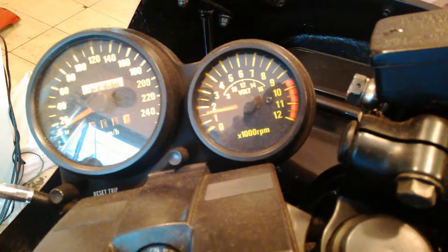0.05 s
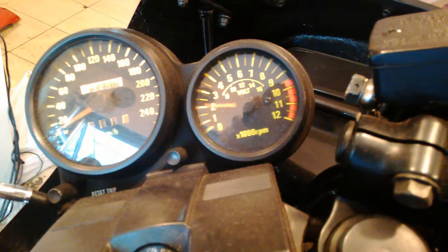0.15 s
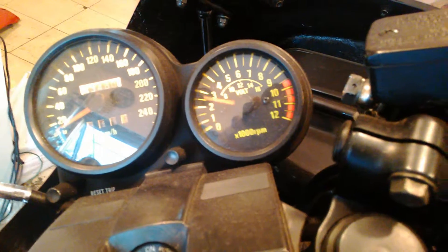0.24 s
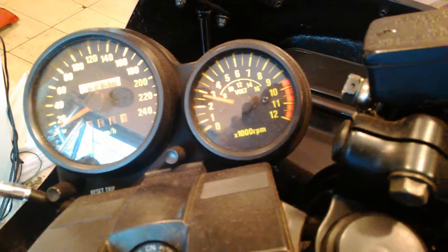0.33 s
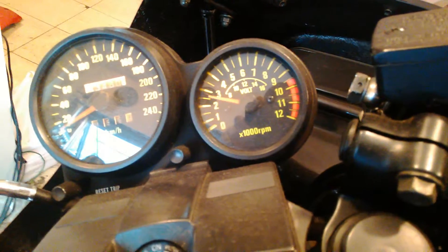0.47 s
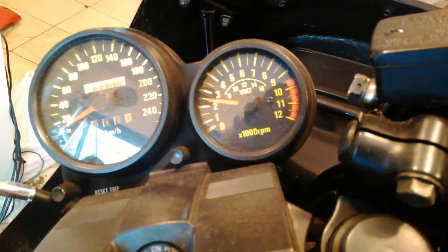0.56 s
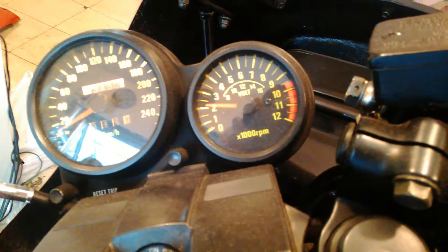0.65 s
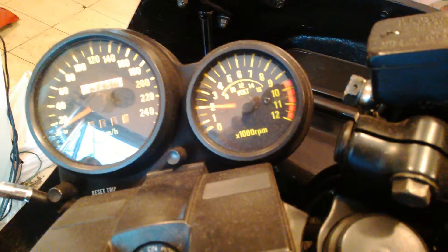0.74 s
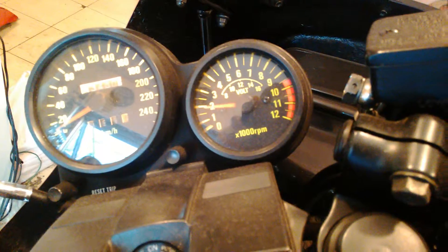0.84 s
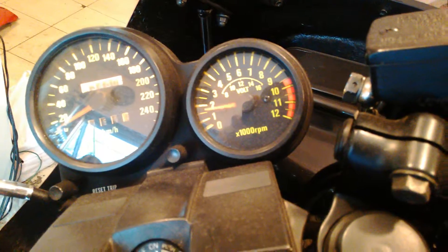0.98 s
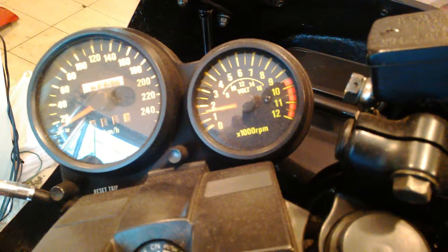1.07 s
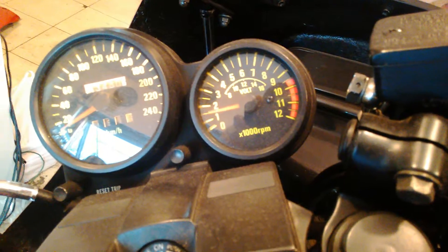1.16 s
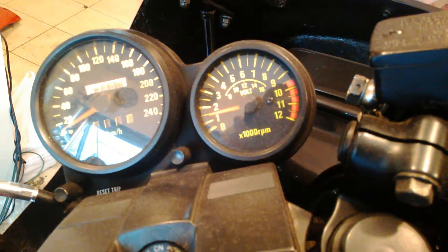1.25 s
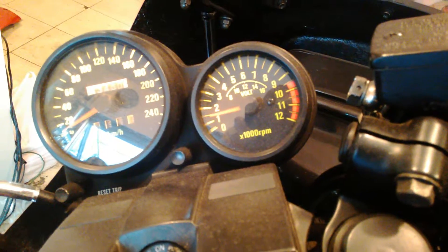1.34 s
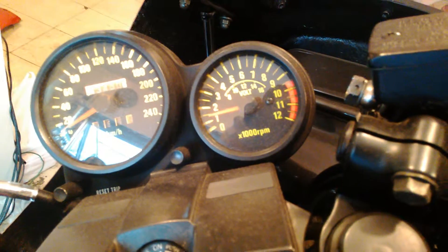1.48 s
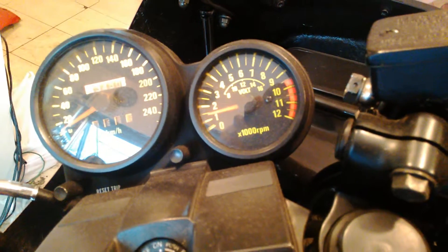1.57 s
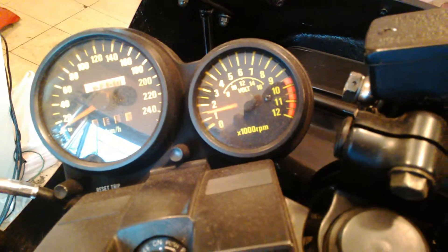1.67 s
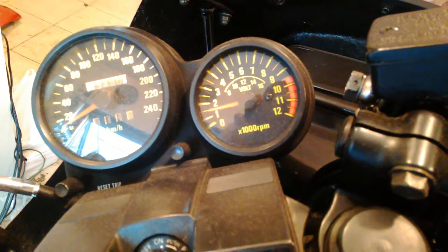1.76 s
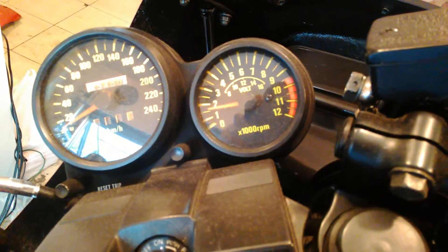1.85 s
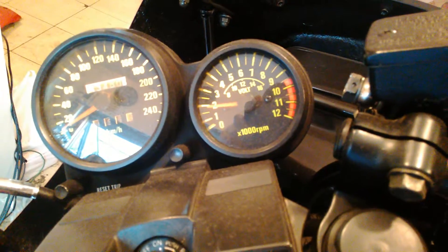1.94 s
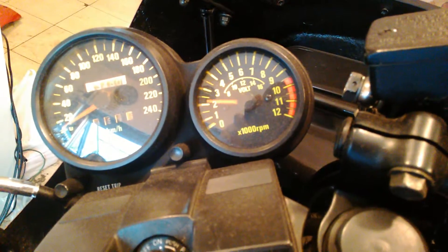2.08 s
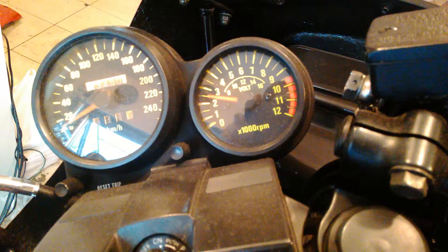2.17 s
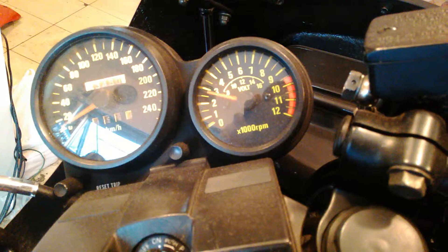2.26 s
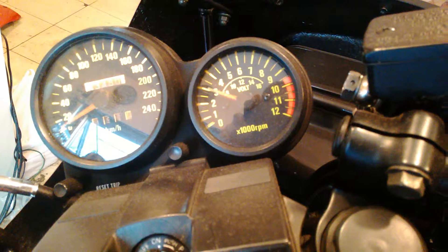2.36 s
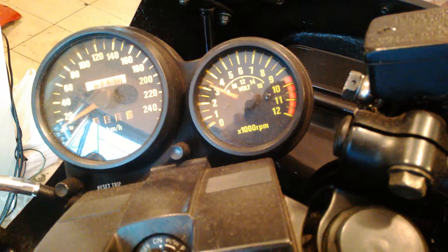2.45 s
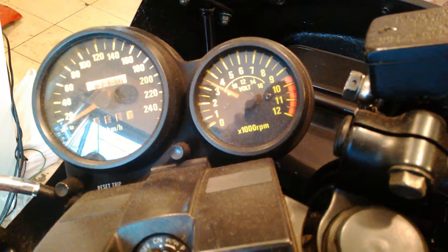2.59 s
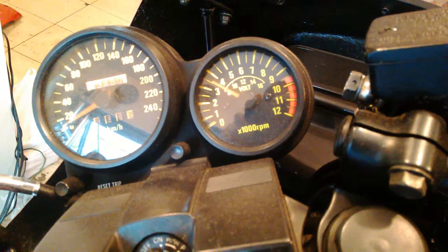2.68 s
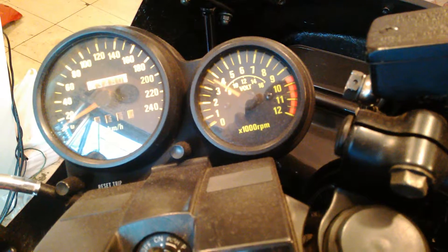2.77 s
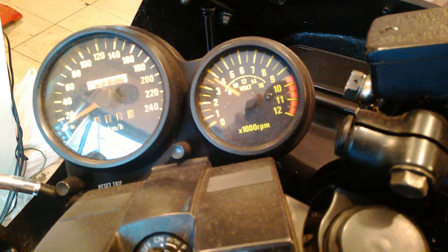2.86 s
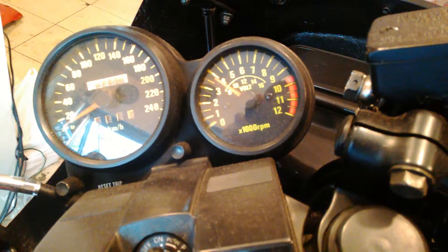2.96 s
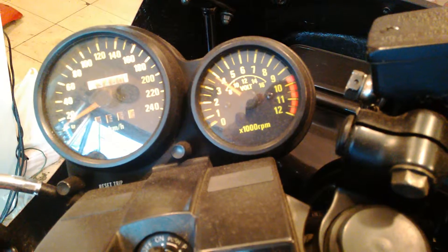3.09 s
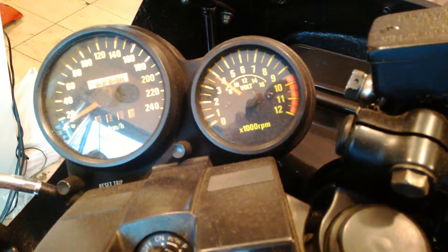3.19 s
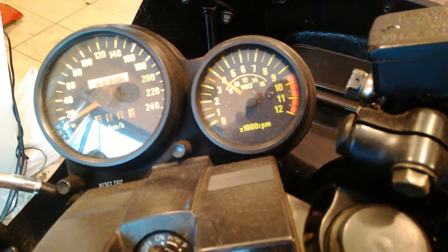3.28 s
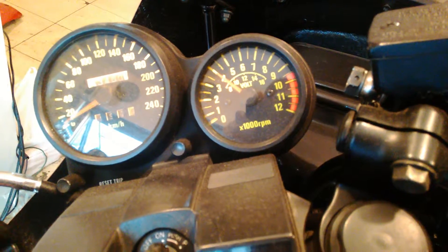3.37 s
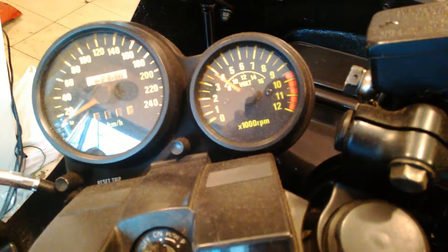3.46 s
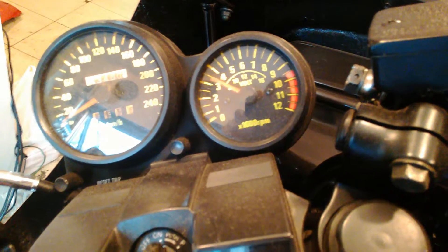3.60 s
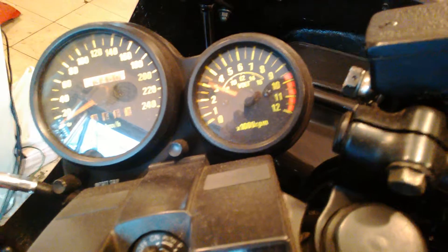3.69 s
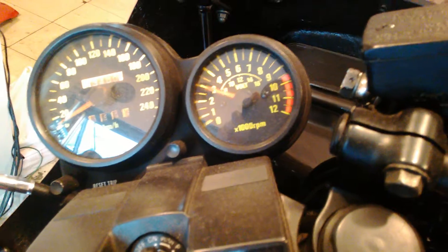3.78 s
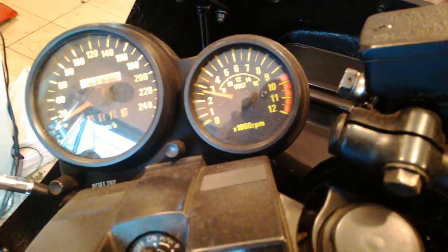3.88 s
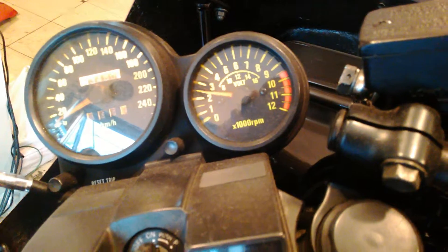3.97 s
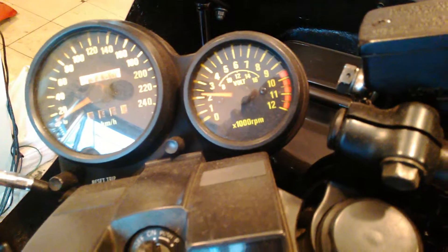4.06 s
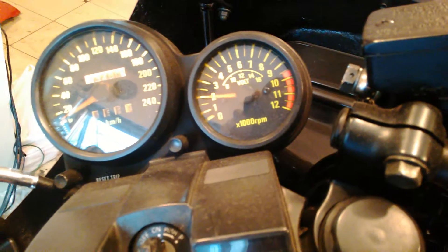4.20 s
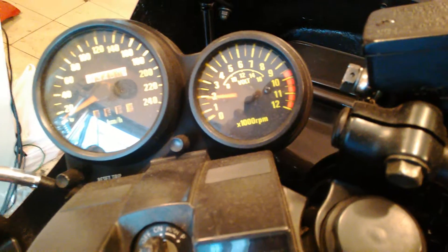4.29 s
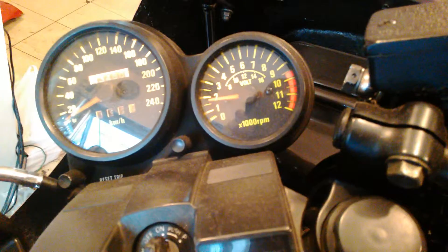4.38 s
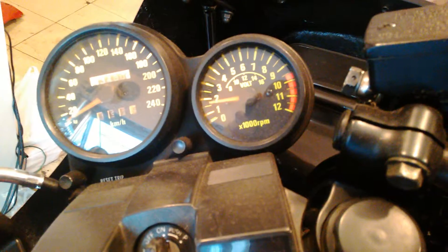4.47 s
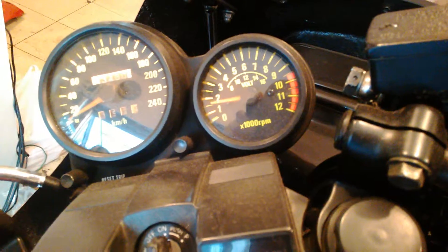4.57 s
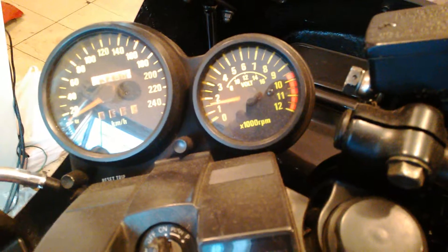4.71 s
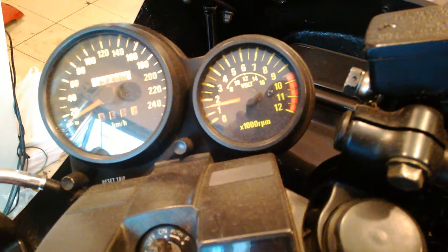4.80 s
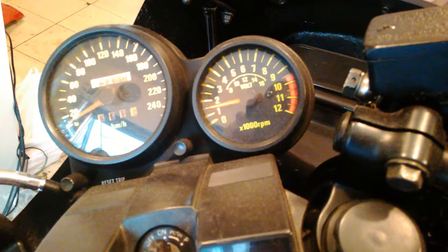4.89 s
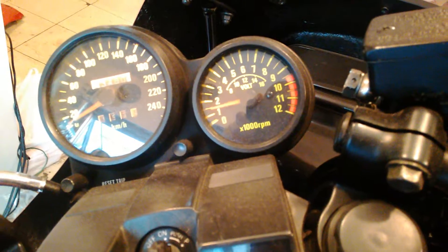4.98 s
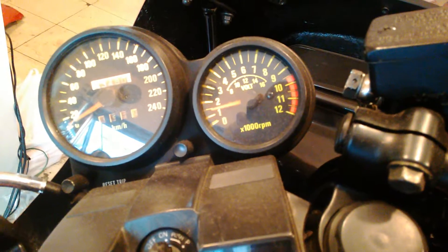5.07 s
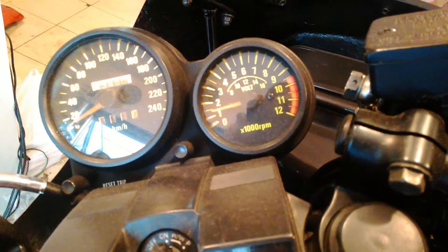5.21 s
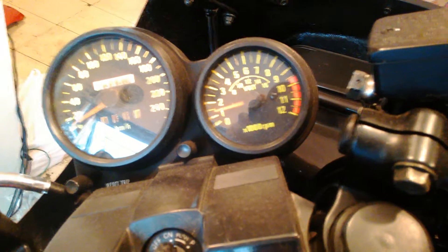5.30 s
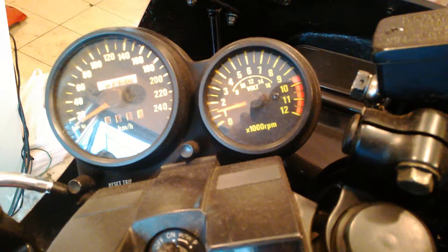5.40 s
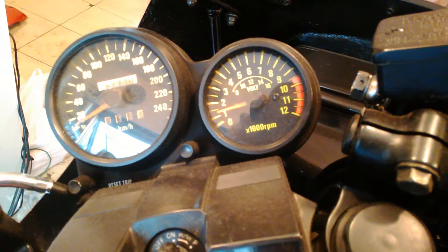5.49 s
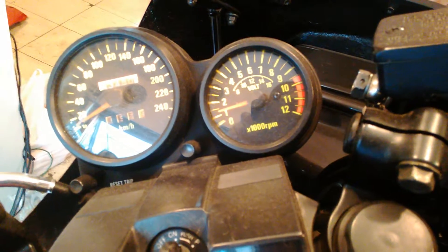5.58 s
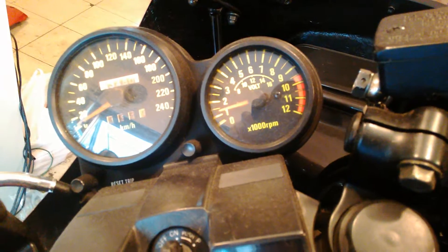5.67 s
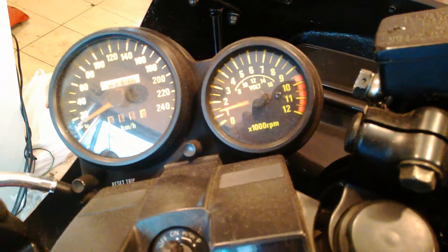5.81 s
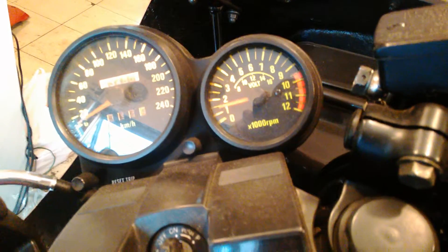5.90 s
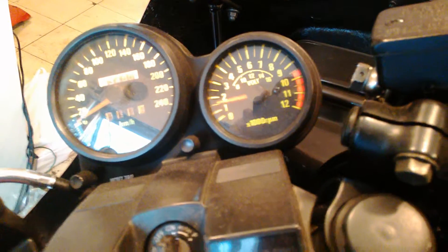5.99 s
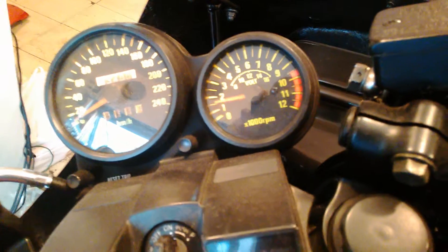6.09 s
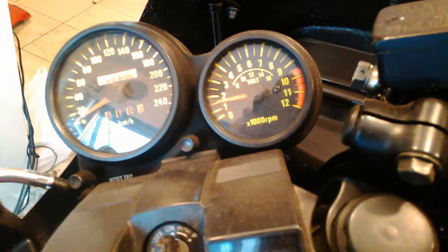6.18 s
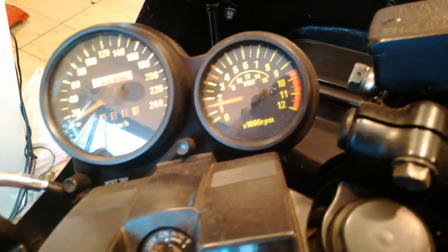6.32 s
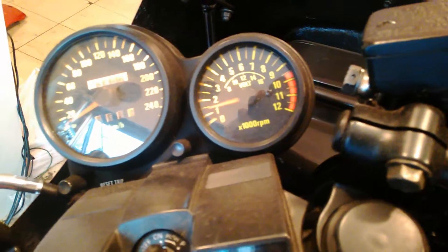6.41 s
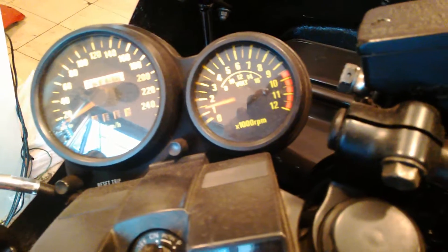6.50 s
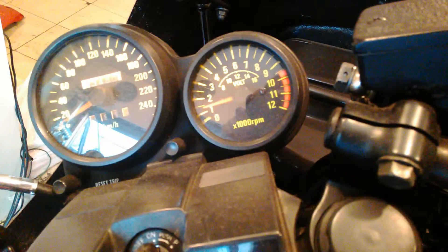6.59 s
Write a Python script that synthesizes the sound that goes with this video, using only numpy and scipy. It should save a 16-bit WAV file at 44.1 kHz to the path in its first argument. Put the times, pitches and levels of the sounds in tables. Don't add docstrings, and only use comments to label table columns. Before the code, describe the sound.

Starting mid-blip, a motorcycle engine flares and falls back to a low uneven idle. After nearly two seconds the throttle opens and the note climbs steadily, exhaust booming, metal casing roaring, air hissing. It holds high, then falls in ragged steps and pops to quiet idling with light valve ticks. A brief blip comes near the end. Mono, close, in a reflective tiled room.

```python
import sys
import numpy as np
from scipy import signal
from scipy.fft import rfft, irfft, next_fast_len
from scipy.io import wavfile
from scipy.ndimage import uniform_filter1d, map_coordinates

SR = 44100
rng = np.random.default_rng(int(sys.argv[2]) if len(sys.argv) > 2 else 0)


def output_pcm(signal):
    pcm = np.clip(np.atleast_2d(signal).T, -1, 1) * 32767
    wavfile.write(sys.argv[1], SR, np.round(pcm).astype(np.int16))


def to_linear_factor(level_db):
    exponent = np.asarray(level_db, float) / 20
    return 10 ** exponent


N = 293253
IDLE_HZ = 45.4


def unit(x):
    return x / np.sqrt(np.mean(x ** 2) + 1e-20)


def curves(rows):
    s, *cols = np.transpose(rows)
    return [np.interp(np.arange(N) / SR, s, c) for c in cols]


def law(table, rate_hz):
    hz, *cols = np.transpose(table)
    return [np.interp(np.log(rate_hz), np.log(hz), c) for c in cols]


def later(x, s):
    return np.interp(np.arange(N) - s * SR, np.arange(N), x)


def louder(*db):
    return 10 * np.log10(sum(to_linear_factor(2 * d) for d in db))


def growth(rate_hz, span):
    return np.gradient(uniform_filter1d(np.log(rate_hz), span)) * SR


def steady(x, span_s):
    span = int(span_s * SR)
    power = uniform_filter1d(uniform_filter1d(x * x, span), span)
    return x / np.sqrt(np.abs(power) + 1e-20)


def wobble(rate):
    knots = rng.standard_normal(int(N * rate / SR) + 4)
    return map_coordinates(knots, [np.arange(N) * rate / SR])


def filtered(x, response):
    m = next_fast_len(N + SR // 2)
    return irfft(rfft(x, m) * response(np.fft.rfftfreq(m, 1 / SR)), m)[:N]


def modes(table):
    def response(f):
        return sum((-1) ** k * to_linear_factor(db) * 1j * f * w / (c * c - f * f + 1j * f * w)
                   for k, (c, w, db) in enumerate(table))
    return response


def hiss(spectrum):
    f, db = np.transpose(spectrum)
    colour = lambda hz: to_linear_factor(np.interp(np.log(hz + 1), np.log(f), db))
    return unit(filtered(rng.standard_normal(N), colour))


def ringing(table, rough_db):
    knocks = to_linear_factor(rough_db * wobble(400)) * rng.standard_normal(N)
    return unit(filtered(knocks, modes(table)))


def throbbing(fired, throb_db, cam_db):
    return throb_db * np.cos(2 * np.pi * fired - .8) + cam_db * np.cos(np.pi / 2 * fired + 1.3)


def beats(turns, scatter_db, jitter_s, pattern):
    at = np.flatnonzero(np.diff(np.floor(turns)) > 0)
    luck = np.clip(rng.standard_normal((N // 100, 2))[:len(at)], -1.8, 1.8)
    scatter = np.broadcast_to(scatter_db, N)[at]
    jitter = np.broadcast_to(jitter_s, N)[at] * SR
    size = to_linear_factor(scatter * (luck[:, 0] + np.resize(pattern, len(at))))
    where = np.clip(at + jitter * luck[:, 1], 0, N - 1).astype(int)
    return np.bincount(where, size / size.mean(), N)


def workshop(x):
    t = np.arange(SR // 3) / SR
    tail = to_linear_factor(-60 * t / 0.17) * rng.standard_normal(len(t))
    return signal.fftconvolve(x, tail / np.linalg.norm(tail))[:N]


# (time [s], speed the crank now drifts toward [firings/s], lag [s])
THROTTLE = [(0, 200, 1.135), (.045, 399, 1.07), (.265, 30, 0.46), (1.05, 48.06, .5), (1.7, 249.8, 2.15),
            (1.91, 140, 0.46), (2.499, 128, 0.29), (2.98, 160.6, 2.6), (3.41, 60, 0.29),
            (3.57, 69.95, 0.37), (3.701, 40, .28), (3.86, 68, 0.28), (3.92, 29.93, .9), (4.569, 46.8, 0.29),
            (4.9, 40.4, 0.69), (5.39, 46.65, .5), (5.875, 170, .62), (6.0, 38.14, 0.21), (6.31, 44, 0.23)]


def crank():
    t = np.arange(N) / SR
    hz = np.full(N, 49.5)
    for s, aim_hz, lag_s in THROTTLE:
        i = max(round(s * SR), 0)
        hz[i:] = aim_hz + (hz[i] - aim_hz) * np.exp(-(t[i:] - t[i]) / lag_s)
    return uniform_filter1d(hz, SR // 40)


def pulling(rate_hz):
    gain = growth(rate_hz, SR // 16)
    full_pull, full_coast = 3, 0.53
    return np.clip(gain / full_pull, 0, 1), np.clip(-gain / full_coast, 0, 1)


PULL_GAIN = dict(pulses=4, orders=4.5, casing=1.5, chain=4, intake=7.5, gear=11)
COAST_GAIN = dict(pulses=0, orders=-7.5, casing=0, chain=-0.5, intake=0.5, gear=-1)


def load_gains(pull, coast):
    return {part: PULL_GAIN[part] * pull + COAST_GAIN[part] * coast for part in PULL_GAIN}


def unevenness(rate_hz, pull):
    falling = np.clip(-growth(rate_hz, SR // 20), 0, 1)
    ragged = np.minimum((IDLE_HZ / rate_hz) ** 2 + .45 * falling, 1.1)
    return np.minimum(ragged + .5 * pull, 1.1)


# (time [s], burn [dB], bark [dB], slack [dB])
EFFORT = [(0, -3, 3.5, 12.5), (.1, 1, 1, 3.5), (.3, -1, 1.5, 0.7), (.8, -2, 2.5, 1), (1.05, 8.5, 4, 1.5),
          (1.33, 2, 4, 2.5), (1.7, 5.8, 3.5, 2.7), (2.1, -2, -1, 1.5), (3.5, -2.2, 2, 1.5),
          (3.85, -2, -3, 1), (4.02, -5, -2, 1), (4.15, 0, 3, 1), (4.35, 3, 0, -4), (4.9, 6.5, -2.5, -1),
          (5.88, 0, -3, 1.5), (6.06, 0.5, 1, 0.5), (6.3, 8, 5.5, 4.3), (6.65, -5, -7, 1)]


def effort():
    return curves(EFFORT)


# (time [s], firing tone [dB], pulses [dB])
BURBLES = [(.12, 1.5, 3.5), (.18, 0, 4.5), (.4, -3, 1), (.575, -15, -17), (.64, -0.5, -6), (.69, -4, -6),
           (.79, 7.5, 6), (.86, -3, -1), (.92, 3, 0), (1.59, 1, 0.5), (2.03, -5, 1), (2.24, -3, 3.5),
           (3.35, 2.2, 2), (3.49, -4, 0), (3.6, -4, 2), (3.68, 3, 3), (3.73, -5, 2), (3.83, -7, 2),
           (3.89, 0.5, -2), (4.03, 2, -2), (4.09, 4.5, 7), (4.25, -4, 1), (4.17, 1.5, 1), (4.32, -4, -2),
           (4.43, 0, 4.5), (4.56, -4, -2), (4.97, 7, 3), (6.03, 1.5, 6), (6.2, -10, -14), (6.25, 1, 0)]


def burbles():
    s, *db = np.transpose(BURBLES)
    return np.array(db) @ np.exp(-((np.arange(N) / SR - s[:, None]) / .022) ** 2)


# (speed [firings/s], firing tone [dB], pulses [dB])
EXHAUST_LEVELS = [(44, -48.5, -52.5), (48.37, -33.5, -45), (61.5, -17.5, -37), (68, -13.5, -33),
                  (81, -13.5, -35.5), (104.5, -17.5, -30.5), (104, -16, -27.5), (128.3, -8, -25.5)]


def exhaust_levels(rate_hz, burn_db, bark_db):
    return np.array(law(EXHAUST_LEVELS, rate_hz)) + [burn_db, bark_db] + burbles()


# (frequency [Hz], width [Hz], level over the pulses [dB])
STANDING_WAVES = [(140, 12, -6), (200, 15, 4.5), (254.5, 24, 2), (292, 16, -4), (352, 9.9, 2),
                  (389.4, 24, -4), (463, 8.2, -5), (504, 14, -2.5), (612, 8.3, -2.5), (642, 17.8, -0.5)]


def lift(hz):
    return 10 * np.log10(sum(to_linear_factor(2 * db) / (1 + (2 * (hz - c) / w) ** 2) for c, w, db in STANDING_WAVES))


def order_levels(rate_hz, tone_db, upper_db, coast):
    orders_db = [tone_db] + [upper_db + lift(k * rate_hz) for k in range(2, 6)]
    fade_db = 1.8 * np.maximum(rate_hz - IDLE_HZ, 0)
    for k, idle_db in ((1, -40.5), (2, -49.5)):
        orders_db[k] = louder(orders_db[k], idle_db - fade_db)
    orders_db[1] = louder(orders_db[1], tone_db - 18.5 + 20 * np.log10(coast + .1))
    return orders_db


def boom(fired, uneven, orders_db):
    cam = np.cos(np.pi / 2 * fired + .4)
    out = to_linear_factor(orders_db[0] - 22 + 1.3 * wobble(13)) * np.cos(3 * np.pi * fired)
    for k, db in enumerate(orders_db):
        lumps_db = (.1 + 1.9 * uneven) * ((.6 + .4 * k) * wobble(24) + cam)
        lag = 2.9 * k * (1 - np.minimum(uneven, 1))
        out = out + to_linear_factor(db + lumps_db) * np.cos(2 * np.pi * (k + 1) * fired + lag)
    return np.sqrt(2) * out


CYLINDERS = [2.2, -0.28, 1.7, 3]
# (frequency [Hz], width [Hz], level [dB])
MUFFLER = [(204, 20, 6.5), (245, 12.3, 9.5), (324, 71, -2)]
# (frequency [Hz], width [Hz], level [dB])
HEADERS = [(339, 145, -1), (474, 27, -1), (513, 14, 1), (647, 62, -3.5), (765, 40, -4), (943, 103, -11.5),
           (1176, 62, -14)]
# (frequency [Hz], width [Hz], level [dB])
ROOM_TONES = [(64, 24.2, 1), (91.5, 41, -1.5), (146, 33, -19)]


def exhaust(fired, rate_hz, uneven, level_db):
    lowest = rate_hz / SR * (1 + sum(2 * np.cos(2 * np.pi * k * fired) for k in range(1, 6)))
    slow = (IDLE_HZ / rate_hz) ** 2
    puffs = beats(fired, .4 + 3 * uneven, .00004 + .0004 * uneven, CYLINDERS)
    pulses = steady(puffs - lowest, .06)
    pulses = pulses + (.13 + .14 * uneven) * rng.standard_normal(N)
    dull = lambda f: modes(MUFFLER)(f) / (1 + 1j * f / 300) ** 2
    deep = lambda f: modes(ROOM_TONES)(f) * (f > 45)
    thump = to_linear_factor(-1.5 + 2.2 * slow) * steady(filtered(pulses, dull), 0.069)
    crack = to_linear_factor(-2.0 - 6.0 * slow) * steady(filtered(pulses, modes(HEADERS)), 0.27)
    rumble = to_linear_factor(-23.5 + 31.0 * slow) * steady(filtered(pulses, deep), 0.2)
    near = to_linear_factor(level_db - 2.5) * (thump + crack)
    return near + to_linear_factor(0.5) * workshop(near) + to_linear_factor(level_db) * rumble


# (speed [firings/s], casing [dB], chain [dB], intake [dB])
RATTLE_LEVELS = [(44, -53, -56, -66.5), (49.6, -48.5, -48.5, -65), (55.7, -41, -39.5, -62),
                 (65.6, -34.5, -34.5, -54), (73.4, -29.5, -29.5, -43), (93, -25, -26.5, -39.5),
                 (108.8, -23, -19.5, -28.5), (128, -17.5, -13.5, -21.5)]


def rattle_levels(rate_hz):
    return law(RATTLE_LEVELS, later(rate_hz, 0.027))


# (time [s], length [s], rattle [dB])
SNATCHES = [(0.299, 0.063, 1.5), (.45, .04, -1), (0.797, 0.056, 0), (1.053, .1, 5), (2.001, 0.097, -1),
            (2.301, .15, -1), (2.557, 0.096, 1.5), (3.35, 0.027, -2.5), (3.471, .1, 1.5), (3.67, 0.079, -1),
            (3.834, .12, 2), (4.142, 0.18, 3), (5.91, 0.053, 6.5), (5.971, .04, 2), (6.088, 0.087, 4)]


def snatches():
    s, length_s, db = np.transpose(SNATCHES)
    return db @ np.exp(-(2 * (np.arange(N) / SR - s[:, None]) / length_s[:, None]) ** 4)


# (frequency [Hz], level per Hz [dB])
CASING = [(260, -4.5), (450, -4.5), (556, -5), (624, -1.5), (834, -6.5), (909, -4.5), (2310, -6.5),
          (4500, -10.5), (5850, -28), (9900, -120)]
# (frequency [Hz], width [Hz], level [dB])
BLOCK = [(1380, 170, -4), (2063, 31, 5), (2990, 46, -6)]


def casing(fired, level_db):
    swell_db = throbbing(fired, 0.37, 0.19) + 0.91 * wobble(90)
    return to_linear_factor(level_db - 3.5 + swell_db) * (hiss(CASING) + 0.24 * ringing(BLOCK, 2.5))


# (frequency [Hz], level per Hz [dB])
CHAIN = [(1760, -15), (3000, -10), (4000, -7.5), (4990, -1.5), (5330, 1), (6450, 3), (7390, -7), (8470, -8),
         (8950, -35), (9560, -9), (10000, -15.5), (13000, -51), (22000, -120)]
# (frequency [Hz], width [Hz], level [dB])
COVERS = [(4840, 140, 5), (6470, 380, 8), (7150, 74, 12), (7670, 66, -14), (8930, 35, -40),
          (10200, 99, -25), (11600, 230, -15)]


def chain(fired, level_db):
    swell_db = throbbing(fired, 1.2, 0.2) + 0.23 * wobble(180)
    return to_linear_factor(level_db - 2.0 + swell_db) * (hiss(CHAIN) + 0.18 * ringing(COVERS, 1.8))


# (time [s], level [dB])
RUSHES = [
    (0.0, -35.5),
    (1.96, -46),
    (5.86, -42),
]


def rushes():
    levels = []
    for s, db in RUSHES:
        t = np.maximum(np.arange(N) / SR - s, 1e-6)
        rise_s, fade_db_per_s = 0.041, 62
        levels.append(db + 20 * np.log10(1 - np.exp(-t / rise_s)) - fade_db_per_s * t)
    return levels


# (frequency [Hz], level per Hz [dB])
INTAKE = [(4410, -26.5), (7500, 6), (7900, -1.5), (8980, -3.5), (9490, -10.5), (11100, -10), (13200, -6.5),
          (15600, -15)]
# (frequency [Hz], width [Hz], level [dB])
FINS = [(9080, 61, 5), (10240, 190, 0.5), (11100, 200, 1), (11930, 190, -3), (13150, 200, -5.5)]


def intake(fired, level_db):
    swell_db = throbbing(fired, 0.55, 0.18) + 1.3 * wobble(150)
    return to_linear_factor(level_db + 3.5 + swell_db) * (hiss(INTAKE) + 0.41 * ringing(FINS, 1.4))


def taut(noise, rate_hz):
    rising = growth(rate_hz, SR // 12)
    low_speed = np.clip((95 - rate_hz) / 30, 0, 1)
    pull = np.clip(.8 * np.abs(rising), 0, 1) * low_speed * np.where(rising > 0, 1, .4)
    middle = filtered(noise, lambda f: np.exp(-(np.log((f + 1) / 3200) / .5) ** 4))
    body = filtered(noise, lambda f: np.exp(-(np.log((f + 1) / 750) / 0.34) ** 4))
    return noise + pull * (1.5 * body - 0.33 * middle)


# (speed [firings/s], gear whine [dB], valve ticking [dB])
PART_LEVELS = [(43.9, -65, -56), (49.42, -57, -52), (60, -50.5, -50), (68, -47, -60), (100, -56, -54),
               (128, -31, -60)]


def part_levels(rate_hz):
    return law(PART_LEVELS, rate_hz)


# (frequency [Hz], width [Hz], level [dB])
VALVES = [(450, 79, -1), (723, 48, 1.5), (950, 70, 0), (1354, 58, -3), (1700.5, 150, -2), (2485, 40, 4.5),
          (3072.5, 87, -2.5), (3771, 230, -10), (4760, 260, -12.5), (5700, 180, 1), (6760, 83, -17),
          (8150, 150, -7)]


def valves(fired, level_db):
    t = np.arange(SR // 12) / SR
    burst = to_linear_factor(-60 * t / 0.044) * (1 - np.exp(-t / 0.0043)) * rng.standard_normal(len(t))
    taps = beats(2 * fired, 3.5, .002, [1, -.8, 0, -1, .6, -1, -.3, -.8])
    noise = signal.fftconvolve(taps, burst)[:N]
    return to_linear_factor(level_db) * steady(filtered(noise, modes(VALVES)), 0.32)


def whine(fired, level_db):
    mesh = 2 * np.pi * 28 * fired
    fuzzy = wobble(380) * np.cos(mesh) + wobble(380) * np.sin(mesh)
    return to_linear_factor(level_db + 0.77 * np.cos(np.pi / 2 * fired + .7)) * fuzzy


# (time [s], level [dB])
GULPS = [
    (0.061, -16),
    (5.892, -15.5),
]


def gulps():
    out, t = np.zeros(N + SR), np.arange(SR // 10) / SR
    for s, db in GULPS:
        knock = to_linear_factor(db - 60 * t / 0.092) * (1 - np.exp(-t / 0.0035))
        out[round(s * SR):][:len(t)] += knock * np.sin(2 * np.pi * 255 * t)
    return out[:N]


# (time [s], peak level [dB], frequency [Hz])
WHINE_SWELLS = [(1.3131, -44, 1339), (1.4143, -37.5, 1380), (1.487, -35, 1345), (1.5728, -35.5, 1364),
                (1.6561, -37, 1368), (1.7306, -42, 1400), (1.814, -38, 1346), (4.544, -47, 1365),
                (4.801, -43, 1350), (5.236, -54, 1267), (5.3355, -53, 1260), (5.5127, -53, 1201),
                (5.6, -47, 1247), (5.6845, -56, 1245), (5.7758, -59, 1234)]


def whine_swells():
    out, t = np.zeros(N), np.arange(SR // 12) / SR
    for s, db, hz in WHINE_SWELLS:
        swell = to_linear_factor(db - 3.0) * np.exp(-((t - .014) / 0.013) ** 2)
        out[round(s * SR):][:len(t)] += swell * np.sin(2 * np.pi * hz * t)
    return out


def scene():
    rate_hz = crank()
    fired = np.cumsum(rate_hz) / SR
    pull, coast = pulling(rate_hz)
    uneven = unevenness(rate_hz, pull)
    load_db = load_gains(pull, coast)
    burn_db, bark_db, slack_db = effort()

    tone_db, exhaust_db = exhaust_levels(rate_hz, burn_db, bark_db)
    orders_db = order_levels(rate_hz, tone_db, exhaust_db + load_db["orders"], coast)
    mono = boom(fired, uneven, orders_db)
    mono = mono + exhaust(fired, rate_hz, uneven, exhaust_db + load_db["pulses"])

    casing_db, chain_db, intake_db = rattle_levels(rate_hz)
    slack_db = slack_db + snatches()
    early_db = later(load_db["intake"], -0.029)
    intake_db = louder(intake_db + 0.21 * slack_db + early_db, *rushes())
    noise = casing(fired, casing_db + slack_db + load_db["casing"])
    noise = noise + chain(fired, chain_db + slack_db + load_db["chain"]) + intake(fired, intake_db)

    gear_db, valve_db = part_levels(rate_hz)
    gear_db = gear_db + np.maximum(load_db["gear"], later(load_db["gear"], 0.13))
    rattle = taut(noise, rate_hz) + valves(fired, valve_db) + whine(fired, gear_db) + whine_swells()

    mono = mono + gulps() + to_linear_factor(-1.2) * rattle + to_linear_factor(-8) * workshop(rattle)
    return np.array([mono, mono])


def top_cut(x):
    return signal.sosfilt(signal.butter(12, 15740, fs=SR, output="sos"), x)


def record(dry):
    cut = signal.sosfiltfilt(signal.butter(3, 33, "high", fs=SR, output="sos"), dry)
    soft = cut / (1 + np.abs(cut / 0.71) ** 5) ** (1 / 5)
    return top_cut(soft)


dry = scene()
out = record(dry)
output_pcm(out)
```